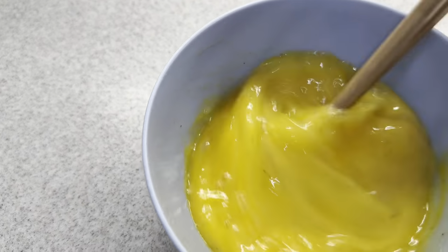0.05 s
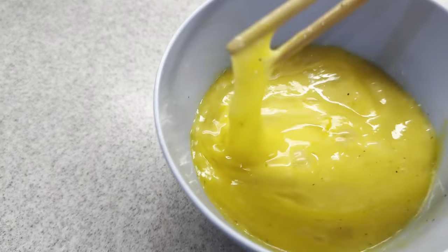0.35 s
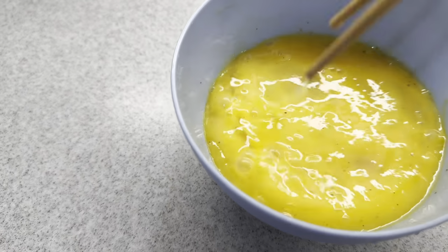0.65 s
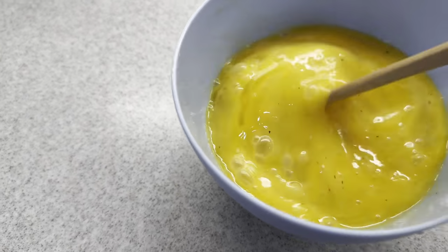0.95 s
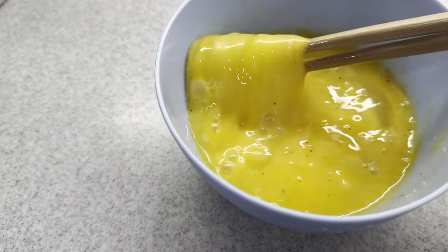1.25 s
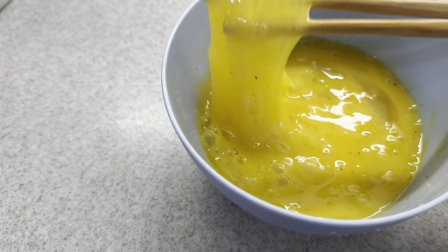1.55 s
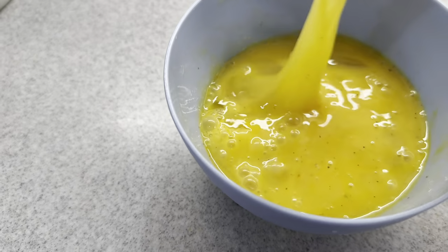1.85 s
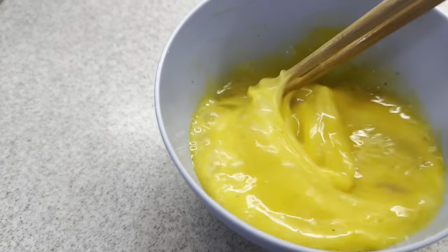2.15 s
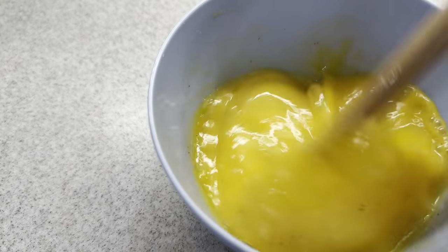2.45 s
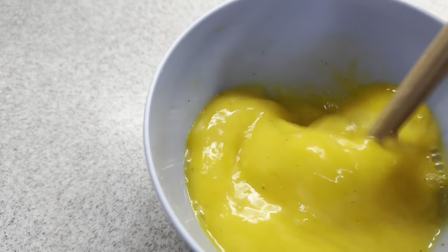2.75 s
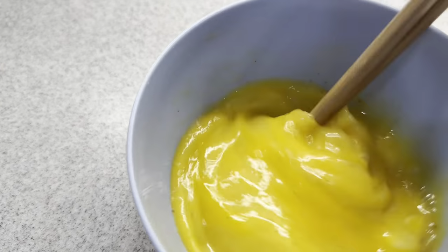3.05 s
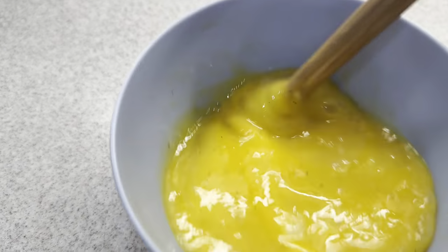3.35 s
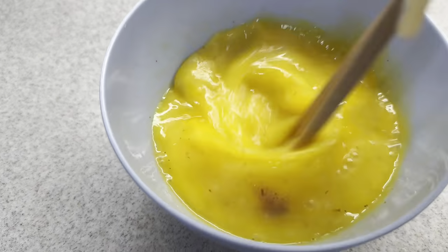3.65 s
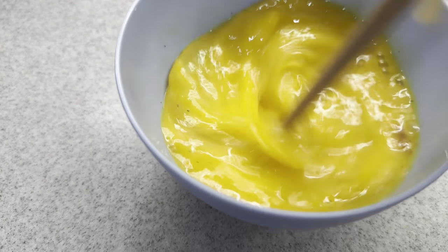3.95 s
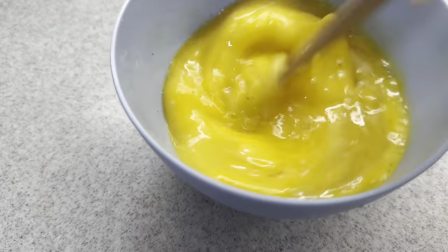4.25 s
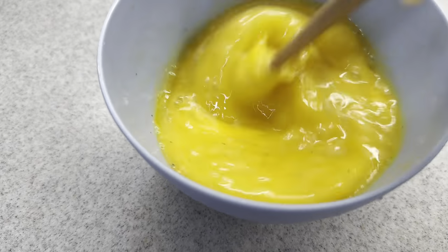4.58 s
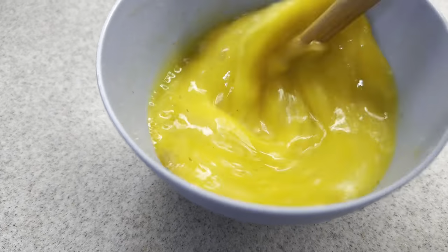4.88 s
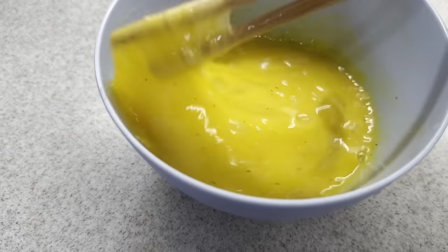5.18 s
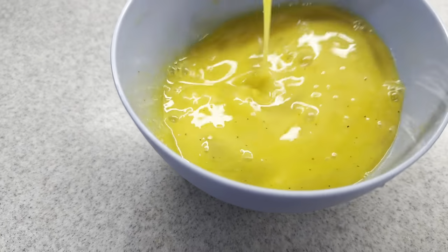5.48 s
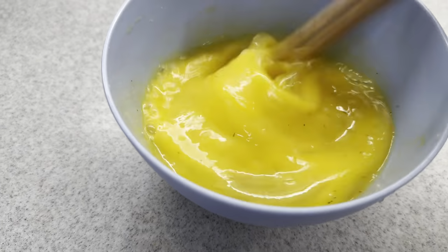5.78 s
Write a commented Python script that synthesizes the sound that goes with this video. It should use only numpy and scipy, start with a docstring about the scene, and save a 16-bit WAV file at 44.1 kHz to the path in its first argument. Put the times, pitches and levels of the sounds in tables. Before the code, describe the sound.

A kitchen appliance gives a steady low hum with a soft fan rush throughout. Right at the start, wooden chopsticks clack against a bowl of raw egg with a small wet gulp. A dull, soft knock follows at 0.8 seconds and a fainter one at 1.1. From 2 seconds the sticks beat quickly, about six strokes a second, each a short, often doubled clack with wet pops. Hollow gulps, falling in pitch, stand out between 2.9 and 3.3 seconds. Then the egg squelches, smacks and pops in fast, pulsing whisking, joined from 3.9 seconds by lighter, crisp clicks against the bowl. The whisking fades at about 5 seconds, leaving the hum. Three firmer strokes come between 5.6 and 6 seconds. The bowl is close to the microphone, slightly to the left, and the small kitchen adds a short echo.

```python
"""Beating eggs with chopsticks

Wooden chopsticks beat raw eggs in a bowl close to the microphones, at up to about six strokes a second.
Impacts of the sticks on the bowl and on each other excite damped modes, heard as clacks. Pockets of air
opening in the egg resonate as pops, squelches and gulps. An appliance hums in the background,
and reflections in the small kitchen add a short tail."""
import sys
import numpy as np
from scipy import signal
from scipy.fft import rfft, irfft
from scipy.io import wavfile

SR = 44100
rng = np.random.default_rng(int(sys.argv[2]) if len(sys.argv) > 2 else 0)


def waveform_to_disk(signal):
    """Save audio, clipped to [-1, 1], as 16-bit WAV at the path in sys.argv[1]."""
    frames = np.transpose(np.atleast_2d(signal))
    scaled = np.clip(frames, -1, 1) * 32767
    samples = np.round(scaled).astype(np.int16)
    wavfile.write(sys.argv[1], SR, samples)


N = 265305

# spectrum of the appliance's fan rush: (frequency [Hz], level [dB])
FAN_SPECTRUM = [(20, -22), (75, -15.5), (125, -4.5), (160, 2), (198, -4), (330, -1), (375, -10),
                (590, -9.5), (700, -17), (1500, -27.5), (2300, -26), (3100, -36), (9300, -44.5),
                (11000, -70)]
# likeness of the rush at left and right: (frequency [Hz], correlation [-1 to 1])
FAN_CORRELATION = [(180, 0.85), (250, -0.24), (325, 1), (390, 0.043), (640, -0.73), (2400, 0.067)]
# motor tones: (frequency [Hz], level [dB], phase between the channels [rad])
MOTOR_TONES = [(240, -48, 1.5), (292, -41, 2.1), (537, -56, 1.5)]
# cavities behind the sticks: (time [s], level [dB], first pitch [Hz], last pitch [Hz], length [s])
CAVITIES = [(0.037, -24, 902, 399, 0.019), (0.804, -25, 950, 880, 0.012), (1.094, -25, 377, 370, 0.009),
            (2.01, -27.5, 450, 398, 0.019), (2.684, -26, 860, 450, 0.013), (2.86, -18, 1146, 260, 0.018),
            (3.021, -28, 472, 360, 0.0305), (3.0626, -16.5, 1430, 950, 0.017),
            (3.068, -12.5, 640, 115, 0.026), (3.191, -30, 472, 337, 0.03), (3.252, -9.5, 1280, 125, 0.022),
            (5.62, -22.5, 414, 375, 0.0093)]
# deep resonances of the bowl, which a gulp leaves ringing: (frequency [Hz], gain [dB])
DEEP_MODES = [(137, 4), (342, -1.5), (420, 3), (610, 2.5), (940, 6.5), (1160, 2), (1365, 3)]
# the leading stick hits the bowl; its partner lands in the egg just before or after it:
# (time [s], strength [dB], hardness as tick over knock [dB], pitch of the contact point [Hz],
# partner's time [s], partner's relative strength [dB], partner's hardness [dB])
STICK_STROKES = [(0.046, -24, -0.5, 1390, 0.0178, -1.5, -5), (0.8046, -32, -21, 1410, 0.7593, 2, -22),
                 (1.084, -40, -4, 1500, 1.094, -13, -24), (2.0216, -22.5, 0, 1966, 1.9984, -2.5, -1.5),
                 (2.182, -24, -1.5, 2040, 2.1639, -19, 1), (2.354, -25, 0, 2185, 2.3316, -12.5, -2.5),
                 (2.5176, -33.5, -0.5, 1800, 2.534, -6, -6), (2.6826, -16.5, -8, 2040, 2.6667, -16, -22.5),
                 (2.856, -20.5, -4, 1940, 2.8527, -3.5, -11), (3.0184, -21, -5.5, 1980, 3.038, 4.5, -9.5),
                 (3.1853, -24.5, -3.5, 1860, 3.2212, 5.5, -13), (3.8839, -32.5, 4.5, 2500, 3.9142, 5, -9.5),
                 (4.047, -29.5, 4.5, 1490, 4.0828, 1, -6.5), (4.204, -26.5, 0.5, 1500, 4.2334, -3.5, -14),
                 (4.3699, -27, -3.5, 1440, 4.3976, -8.5, -6), (4.5334, -30, 6, 2450, 4.508, -15, -2),
                 (4.7018, -28, 4, 1520, 4.7288, -5, -12), (4.865, -28, 0.5, 2590, 4.8262, -5, -10),
                 (5.633, -22.5, 2, 2210, 5.612, -2.5, -3.5), (5.7938, -18, -4, 1980, 5.838, -18, -27),
                 (5.9755, -20, -9, 2003, 5.9559, -3.5, -11.5)]
# modes of the bowl, damped by the egg: (frequency [Hz], level [dB], t60 [s])
BOWL_MODES = [(1389, 15.5, 0.026), (1500, 7, 0.035), (2055, 15.5, 0.024), (2580, 12, 0.019)]
# spectra of a knock, snapping wood, ticking glaze and a wet smack: (frequency [Hz], level [dB])
KNOCK_SPECTRUM = [(300, -5.5), (850, -10), (1250, 1.5), (2600, -4), (4500, -28)]
WOOD_SPECTRUM = [(1800, -30.5), (2700, 5.5), (3900, 2), (5300, -1), (6500, -6.5), (10000, -63.5)]
GLAZE_SPECTRUM = [(3000, -47.5), (5700, 2), (7400, 4.5), (9500, 6.5), (11300, -13.5), (13000, -1),
                  (15500, -5)]
SMACK_SPECTRUM = [(700, -4.5), (1400, -20), (3000, -5), (9000, -8.5), (11300, -18), (14000, -12)]
# the largest air pockets bursting: (time [s], ring level [dB], smack level [dB], pitch [Hz])
LARGE_POPS = [(1.984, -40, -36, 2200), (2.164, -30, -43, 1884), (2.496, -27, -43, 1920),
              (2.6669, -22.5, -47, 1380), (2.736, -28.5, -59, 1200), (2.783, -36.5, -49, 1180),
              (3.478, -37, -40.5, 1900), (3.5217, -28, -40, 1940), (3.6006, -26, -37.5, 1370),
              (3.662, -27, -39, 1350), (3.7, -25, -38, 1270), (3.7258, -33.5, -34, 2900),
              (3.749, -28, -48, 2150), (3.791, -34, -39, 1390), (3.87, -28, -34.5, 2120),
              (4.121, -36, -40.5, 1350), (4.8036, -31.5, -39.5, 1494), (4.986, -32.5, -44.5, 1864)]
# responses of the kitchen's diffuse echoes and of the left microphone: (frequency [Hz], gain [dB])
ROOM_RESPONSE = [(100, 2), (1350, -1), (14000, -7.5)]
LEFT_MIC_RESPONSE = [(1500, 0), (1900, 0.5), (4300, 3.5), (7050, 2.5), (7500, 6), (8600, 2.5), (9500, -0.5)]

HIT_T = np.arange(4096) / SR  # time axis of one short sound
LEAD_S = .004  # grazing before a stick or bubble gives its main blow


def gain_of(db):
    """Amplitude ratio: a factor of ten for every 20 dB."""
    return 10 ** (np.asarray(db) / 20)


def unit_rms(x):
    """Power normalisation: scales to rms 1."""
    return x / np.sqrt(np.mean(x ** 2) + 1e-20)


def at_level(x, db):
    """Energy normalisation: gives a short sound the energy of 10 ms at this level."""
    energy = np.mean(np.sum(x ** 2, -1))
    return x * gain_of(db) * np.sqrt(SR / 100 / (energy + 1e-20))


def curve_at(points, hz):
    """Interpolation on a log-frequency axis."""
    f, value = np.transpose(points)
    return np.interp(np.log(hz + 1), np.log(f + 1), value)


def add(mix, s, sound):
    """Superposition: mixes a sound into both channels at time s."""
    part = mix[:, max(round(s * SR), 0):][:, :sound.shape[-1]]
    part += sound[..., :part.shape[-1]]


def convolve(x, taps):
    """Convolution with an impulse response, keeping the length."""
    return signal.fftconvolve(x, np.atleast_2d(taps), axes=1)[:, :x.shape[1]]


def coloured(x, spectrum):
    """Minimum-phase filtering: the Hilbert transform of the log gain sets the phase."""
    hz = abs(np.fft.fftfreq(len(HIT_T) // 2, 1 / SR))
    log_gain = np.log(gain_of(curve_at(spectrum, hz)))
    response = np.exp(np.conj(signal.hilbert(log_gain)))
    return convolve(x, np.fft.ifft(response).real)


def drift(t, max_hz):
    """Beating of twelve random sines: a wander of rms 1."""
    return unit_rms(sum(np.sin(2 * np.pi * (f * t + rng.random())) for f in max_hz * rng.random(12)))


def appliance(rush_db=-36.5, waver_hz=1.1, flutter=0.42):
    """Broadband and tonal noise: a fan's rush, and motor tones modulated in pitch and amplitude."""
    hz, t = np.fft.rfftfreq(2 * N, 1 / SR), np.arange(N) / SR
    left, other = rfft(rng.standard_normal((2, 2 * N)))
    correlation = curve_at(FAN_CORRELATION, hz)
    right = correlation * left + np.sqrt(1 - correlation ** 2) * other
    rush = irfft(np.array([left, right]) * gain_of(curve_at(FAN_SPECTRUM, hz)))[:, :N]
    out = gain_of(rush_db) * unit_rms(rush)
    for tone_hz, db, phase in MOTOR_TONES:
        cycles = np.cumsum(tone_hz + waver_hz * drift(t, max_hz=8.6)) / SR
        amplitude = np.sqrt(2) * gain_of(db) * (1 + flutter * drift(t, max_hz=6))
        out += amplitude * np.sin(2 * np.pi * cycles + np.array([[0], [phase]]))
    return out


def gulps(roughness=0.58, spread_rad=0.42, wobble=0.2, ragged_db=3.3, t60=.1, notch_hz=750):
    """Cavity resonance: the note falls as the cavity grows, ragged walls break it up, the bowl rings."""
    out = np.zeros((2, N))
    for s, db, first_hz, last_hz, length in CAVITIES:
        age = HIT_T / length
        glide_hz = first_hz * (last_hz / first_hz) ** np.minimum(age, 1)
        hz = glide_hz * np.exp(wobble * drift(HIT_T, max_hz=319))
        swell = (1 - np.exp(-HIT_T / 0.00026)) * np.exp(-1.4 * age ** 2)
        swell *= gain_of(ragged_db * (drift(HIT_T, max_hz=350) - 1))
        note = np.sin(2 * np.pi * np.cumsum(hz) / SR + spread_rad * rng.standard_normal((2, 1)))
        band = [(first_hz / 4, -12), (first_hz / 2, -4), (first_hz * 1.03, 0),
                (first_hz * 3, -16), (first_hz * 9, -42)]
        slosh = coloured(rng.standard_normal((2, len(age))), band)
        add(out, s, gain_of(db) * swell * (note + roughness * unit_rms(slosh)))
    # the bowl hardly radiates between its deep and middle modes
    out = signal.lfilter(*signal.iirnotch(notch_hz, 4.5, SR), out)
    width_hz = np.log(1000) / np.pi / t60
    return out + sum(gain_of(db) * signal.lfilter(*signal.iirpeak(f, f / width_hz, SR), out)
                     for f, db in DEEP_MODES)


def contact(decay_s, impulse_db, rebound=0, correlation=0.24, rise_s=0.001, left_lag_s=.00007):
    """Impact excitation: grazing, chattering noise with one sharp impulse and an optional bounce."""
    t = HIT_T - LEAD_S
    bounce_s = .0028 * rng.triangular(.5, 1, 2)
    ages = np.array([t, t - bounce_s])
    blow, bounce = np.exp(np.minimum(ages / rise_s, -ages / decay_s))
    force = np.hypot(blow, rebound * bounce) * gain_of(6 * drift(t, max_hz=692))
    a, b = rng.standard_normal((2, len(t))) * force
    chatter = np.array([a, correlation * a + np.sqrt(1 - correlation ** 2) * b])
    impulse = signal.unit_impulse(len(t), round(LEAD_S * SR))
    left, right = at_level(chatter, 0) + at_level(impulse, impulse_db)
    return np.array([np.roll(left, round(left_lag_s * SR)), right])


def ring(hz, t60, spread_rad=0.46, rise_s=0.001305, left_lead_s=.00011):
    """Damped oscillation: one mode decays exponentially, on average a little ahead on the left."""
    t = np.maximum(HIT_T - LEAD_S + rise_s, 0)
    phase = spread_rad * rng.standard_normal((2, 1)) + np.pi * hz * left_lead_s * np.array([[1], [-1]])
    envelope = np.exp(-np.log(1000) * t / t60) * (1 - np.exp(-t / rise_s))
    return envelope * np.sin(2 * np.pi * hz * t + phase)


def uneven(spectrum, depth_db=3.5):
    """Selective excitation: where a blow lands favours some resonances over others, here at random."""
    hz = np.geomspace(spectrum[0][0], spectrum[-1][0], num=16)
    return np.column_stack([hz, curve_at(spectrum, hz) + depth_db * rng.standard_normal(len(hz))])


def clack(knock_db, hardness_db, hz, cushion_db=0, rebound=0.62, dull_above_hz=3100):
    """Modal response to impact: the bowl rings, the wood snaps and the hard glaze ticks."""
    tick_db = knock_db + hardness_db
    snap_db = -12 + .33 * knock_db + .31 * tick_db + cushion_db  # louder on strong and on hard blows
    modes = sum(gain_of(db) * ring(f, t60) for f, db, t60 in BOWL_MODES)
    knock = coloured(contact(decay_s=0.0025, impulse_db=-16.5, rebound=rebound), KNOCK_SPECTRUM)
    contact_note = ring(hz, t60=0.019)
    bowl = at_level(modes, -5) + at_level(knock, -0.6) + at_level(contact_note, 0.9)
    db_per_octave = 0.51 * min(hardness_db, 0)  # egg dulls the snap of a soft blow
    wood = [(f, db + db_per_octave * max(np.log2(f / dull_above_hz), 0))
            for f, db in uneven(WOOD_SPECTRUM)]
    snap = coloured(contact(decay_s=0.0018, impulse_db=-12.5, rebound=rebound, left_lag_s=0), wood)
    tap = contact(decay_s=0.0018, impulse_db=-6, correlation=0.71)
    tick = coloured(tap, uneven(GLAZE_SPECTRUM, depth_db=1.5))
    return at_level(bowl, knock_db) + at_level(snap, snap_db) + at_level(tick, tick_db)


def chopsticks(partner_pitch_ratio=0.94):
    """Damping and loading: both sticks land, and egg cushions the partner's snap and lowers its pitch."""
    out = np.zeros((2, N))
    for s, db, hardness_db, hz, partner_s, partner_db, partner_hardness_db in STICK_STROKES:
        add(out, s - LEAD_S, clack(db, hardness_db, hz))
        partner = clack(db + partner_db, partner_hardness_db, hz * partner_pitch_ratio, cushion_db=-2.5)
        add(out, partner_s - LEAD_S, partner)
    return out


def whisking(t, start_s=3.245, end_s=4.815, rise_s=0.36, release_s=0.11, stroke_hz=6.54):
    """Amplitude modulation: fast whisking builds, slowly tires and stops, swelling with every sweep."""
    age = t - start_s
    spell = np.clip(age / rise_s, 0, 1) * np.exp(-np.maximum(t - end_s, 0) / release_s)
    effort_db = -42.5 - 4.5 * age
    swing_db = 3 * np.cos(2 * np.pi * stroke_hz * (t - 4.41))  # one sweep peaks at 4.41 s
    return spell * gain_of(effort_db + swing_db)


def churn(t, drag_db=-15.5, splash_db=-30, settle_s=0.081):
    """Forcing and relaxation: the egg's agitation follows the strongest of whisking, drag and splash."""
    work = whisking(t)
    for s, db, _, _, partner_s, partner_db, _ in STICK_STROKES:
        between_landings = (t > min(s, partner_s)) * (t < max(s, partner_s))
        drag = gain_of(db + min(partner_db, 0) + drag_db) * between_landings
        splash = gain_of(db + splash_db) * (t > s) * np.exp(-abs(t - s) / settle_s)
        work = np.maximum(work, np.maximum(drag, splash))
    return work


def squelch(snaps_per_s=650, gain_db=-4, bands=20):
    """Shot noise: tiny bubbles and strands of egg snap in clumps, each at one of many pitches."""
    t = np.arange(N) / SR
    clumps = gain_of(6.5 * drift(t, max_hz=30))
    onsets = rng.random(N) < snaps_per_s / SR
    sizes = gain_of(3.5 * np.minimum(rng.exponential(1, N), 3))
    snaps = onsets * sizes * clumps
    band = rng.integers(0, bands, N)
    out = np.zeros((2, N))
    for k, hz in enumerate(np.geomspace(1200, 15000, bands)):
        grain = contact(decay_s=.0016, impulse_db=-6) + at_level(ring(hz, t60=28 / hz), 1)
        out += convolve(np.tile(snaps * (band == k), (2, 1)), grain)
    return gain_of(gain_db) * churn(t) * unit_rms(coloured(out, SMACK_SPECTRUM))


def pop(ring_db, smack_db, hz):
    """Air-pocket resonance: a film of egg bursts with a smack and the pocket under it rings briefly."""
    note = ring(hz, t60=0.027)
    knock = coloured(contact(decay_s=0.004, impulse_db=-8.5), uneven(KNOCK_SPECTRUM, depth_db=4.5))
    pocket = at_level(note, 0) + at_level(knock, -4)
    smack = coloured(contact(decay_s=0.0046, impulse_db=-29), uneven(SMACK_SPECTRUM))
    return at_level(pocket, ring_db) + at_level(smack, smack_db)


def pops(count=220, ring_db=3.5, smack_db=-2.5, spread_db=3):
    """Superposed bursts: the large pops, and scattered small ones whose amplitude follows the churn."""
    out = np.zeros((2, N))
    for s, *pocket in LARGE_POPS:
        add(out, s - LEAD_S, pop(*pocket))
    times = (np.arange(count) + rng.random(count)) * N / SR / count
    for s, agitation in zip(times, churn(times)):
        size_db, wet_db = spread_db * rng.uniform(-0.95, 1, 2)
        hz = rng.triangular(1086, 1350, 2313)
        add(out, s, agitation * pop(ring_db + size_db, smack_db + wet_db, hz))
    return out


def spatter(count=2, max_flight_s=.09, drop_db=-27, spread_db=5):
    """Drop impact: each stroke flings a few drops, which land with tiny smacks after their flight."""
    out = np.zeros((2, N))
    for s, db, *_ in STICK_STROKES:
        for flight, size in rng.random((count, 2)):
            drop = coloured(contact(decay_s=.002, impulse_db=-5), uneven(SMACK_SPECTRUM))
            add(out, s + flight * max_flight_s, at_level(drop, db + drop_db + spread_db * (2 * size - 1)))
    return out


def thuds(delay_s=0.0183, swell_s=.009, slump_db=-27.5):
    """Bulk motion: the mass of egg slumps after each stroke's last landing, and rumbles as it swirls."""
    out = np.zeros((2, N))
    swell = HIT_T / swell_s * np.exp(-HIT_T / swell_s)
    for s, db, _, _, partner_s, *_ in STICK_STROKES:
        slump = np.sin(2 * np.pi * rng.uniform(65, 95) * HIT_T) * swell
        add(out, max(s, partner_s) + delay_s, at_level(slump, db / 2 + slump_db))
    swirl = coloured(rng.standard_normal((1, N)), [(20, -32), (65, -4), (250, -12.5), (900, -56)])
    return out + whisking(np.arange(N) / SR) * unit_rms(swirl)


def echoes(early_db=-7.5, tail_db=-14.5, wall_db=-15, early_decay_s=0.011, wall_s=0.01053, t60=0.46):
    """Impulse response: early echoes off bowl, hand and counter, scatter off a wall, and a short tail."""
    t = np.arange(SR // 2) / SR
    early, wall, tail = rng.standard_normal((3, 2, len(t)))
    early *= np.exp(-t / early_decay_s) * (t > .004)
    wall *= np.exp(-10 * abs(t / wall_s - 1))
    tail *= (t > wall_s) * np.exp(-np.log(1000) * t / t60)
    diffuse = gain_of(early_db) * unit_rms(early) + gain_of(tail_db) * unit_rms(tail)
    return (coloured(diffuse, ROOM_RESPONSE) + gain_of(wall_db) * unit_rms(wall)) / np.sqrt(len(t))


def kitchen(x, sway_hz=1.7, patterns=3):
    """Time-varying reflection: hand and microphones keep moving, so the echo patterns cross-fade."""
    cycles = sway_hz * np.arange(N) / SR
    shares = [np.maximum(np.cos(2 * np.pi * (cycles - k / patterns)), 0) for k in range(patterns)]
    return x + sum(convolve(x * np.sqrt(share), echoes()) for share in shares)


def scene():
    """Level difference places the bowl a little to the left, in front of the hum."""
    bowl = chopsticks() + pops() + gulps() + thuds() + squelch() + spatter()
    left, right = kitchen(bowl) * gain_of([[.6], [-1.2]])
    mid = (left + right) / 2
    side = coloured((left - right)[None] / 2, [(130, -1.5), (500, 0)])  # slightly narrower in the bass
    return mid + np.vstack([side, -side]) + appliance()


def record(dry, low_cut_hz=52, band_edge_hz=16100):
    """Microphone response: a treble resonance on the left, a cut in the deepest bass, a steep top edge."""
    mics = np.vstack([coloured(dry[:1], LEFT_MIC_RESPONSE), dry[1:]])
    mics = signal.sosfilt(signal.butter(3, low_cut_hz, "highpass", fs=SR, output="sos"), mics)
    lowpass = signal.firwin(255, band_edge_hz, window=("kaiser", 9), fs=SR)
    return signal.oaconvolve(mics, lowpass[None], "same")


dry = scene()
out = record(dry)
waveform_to_disk(out)
```